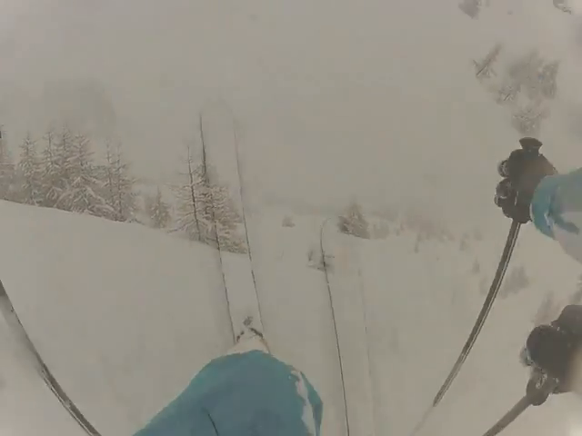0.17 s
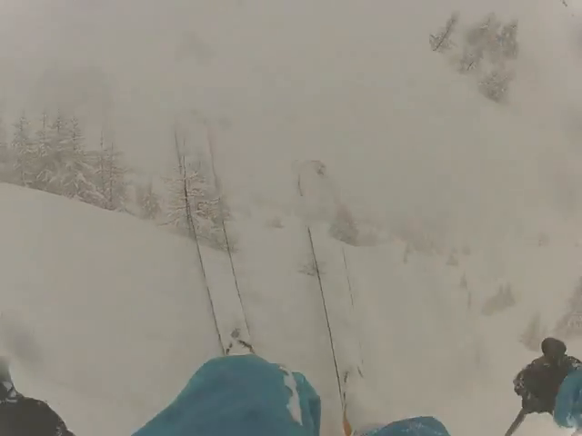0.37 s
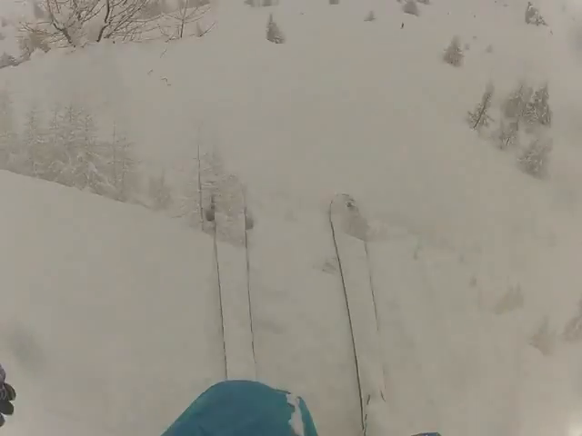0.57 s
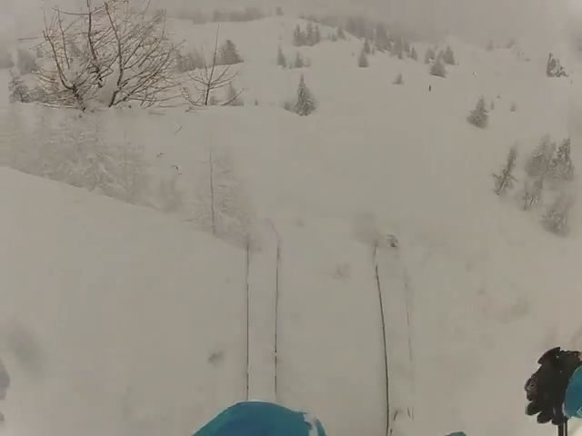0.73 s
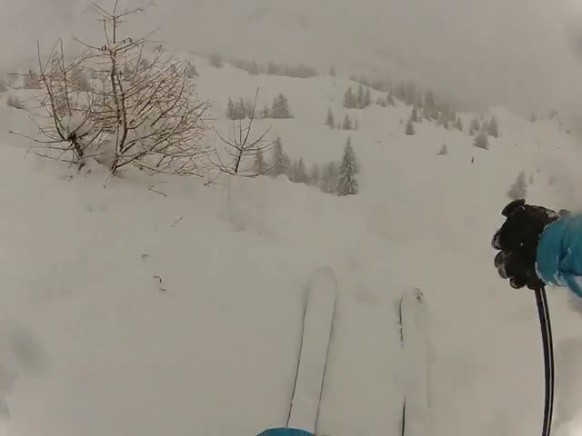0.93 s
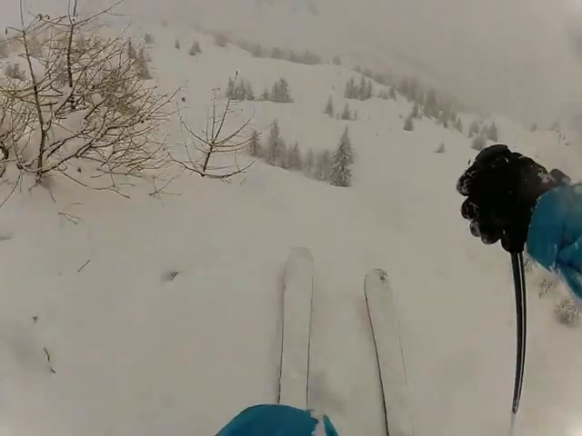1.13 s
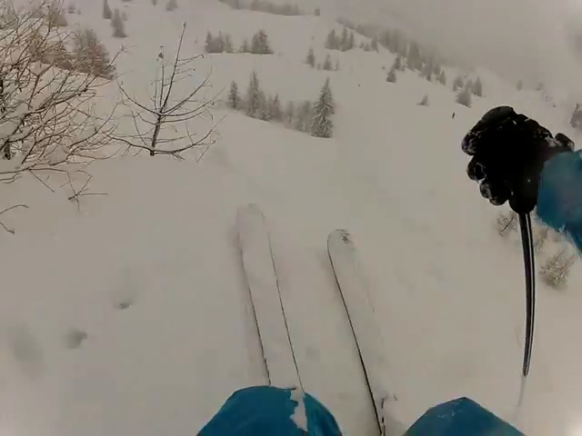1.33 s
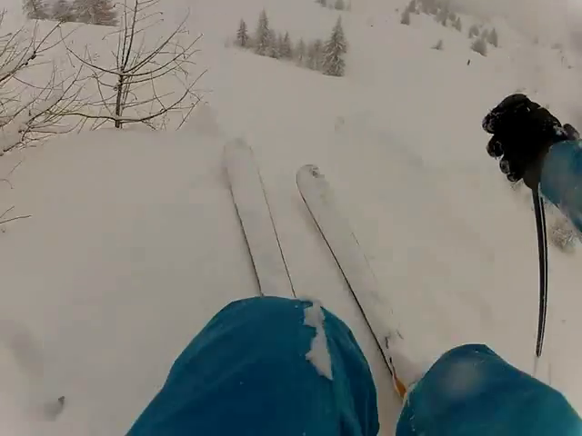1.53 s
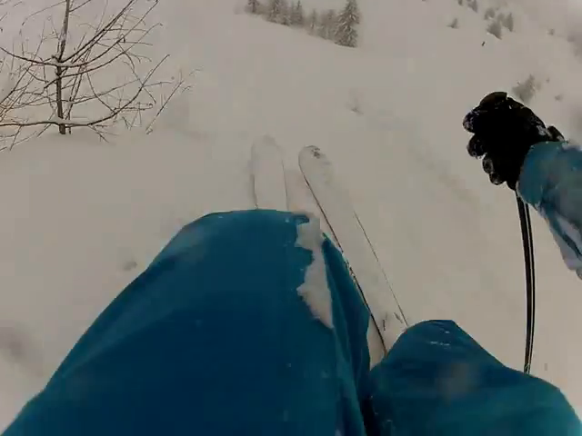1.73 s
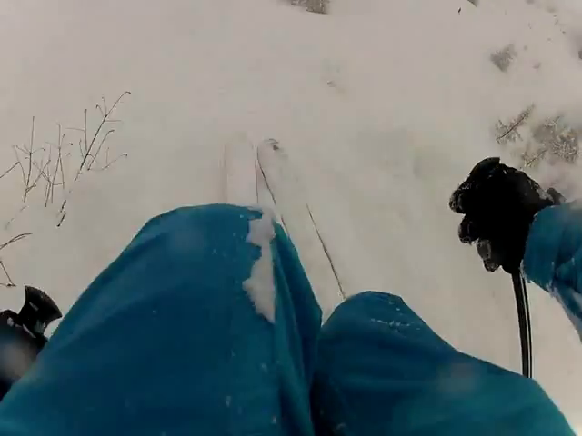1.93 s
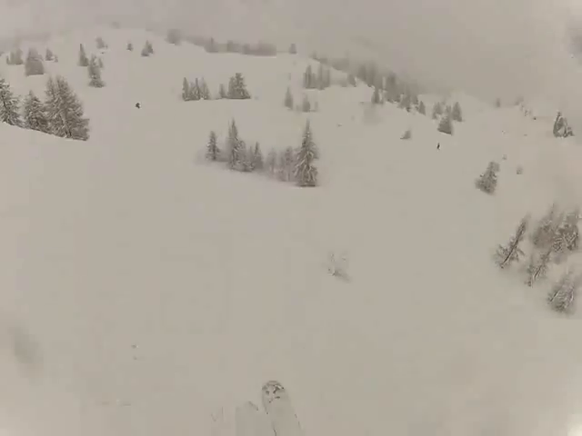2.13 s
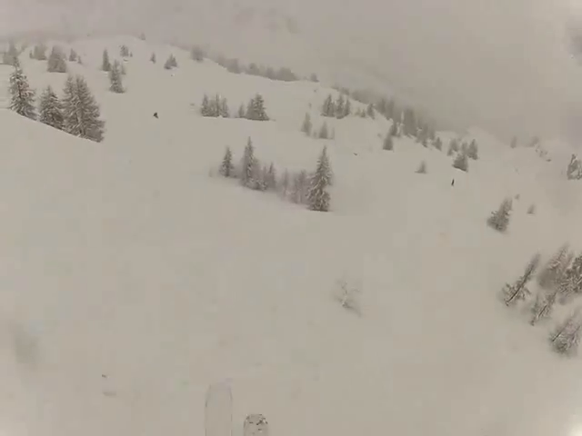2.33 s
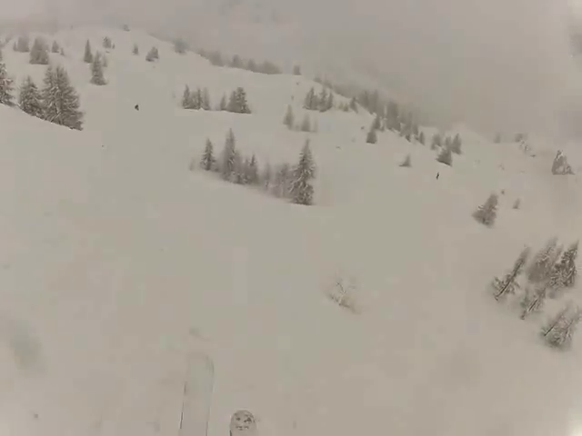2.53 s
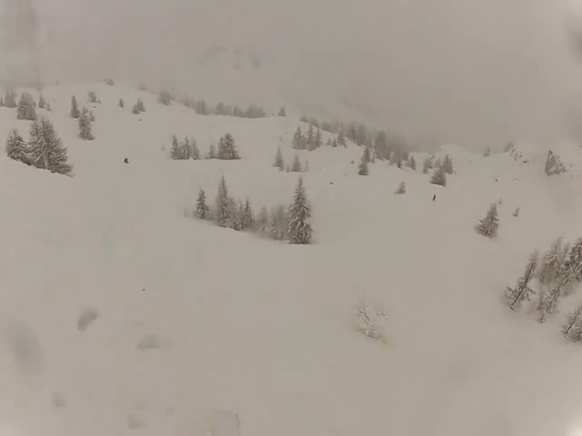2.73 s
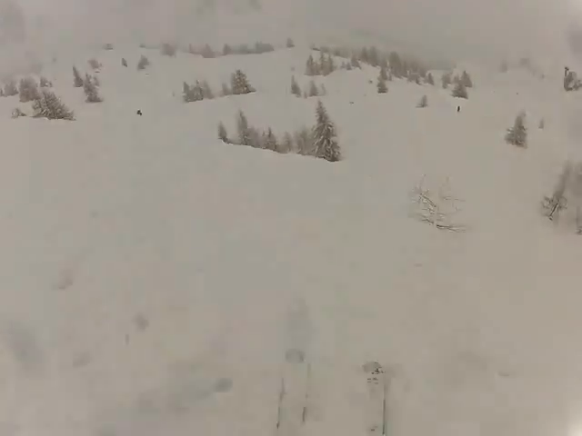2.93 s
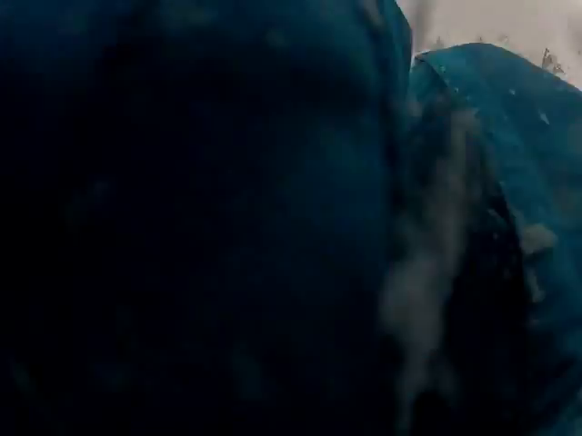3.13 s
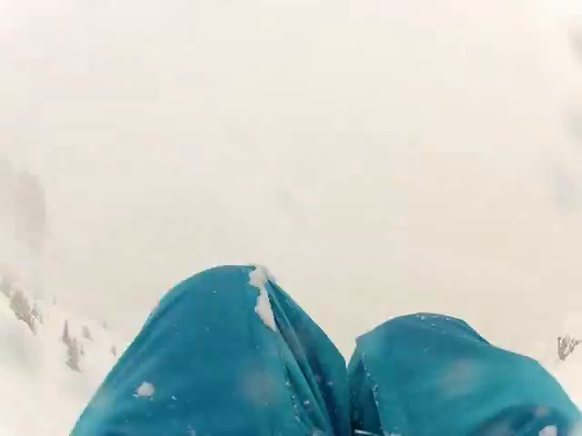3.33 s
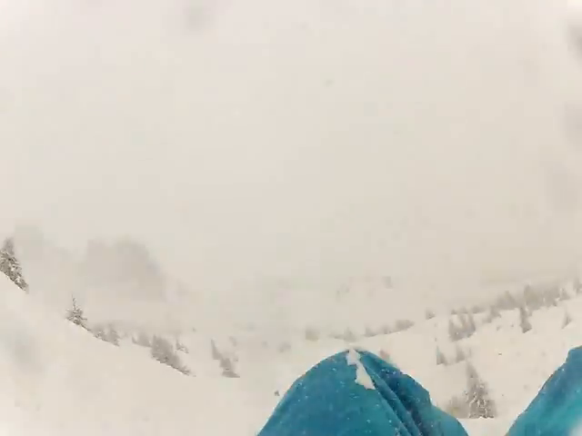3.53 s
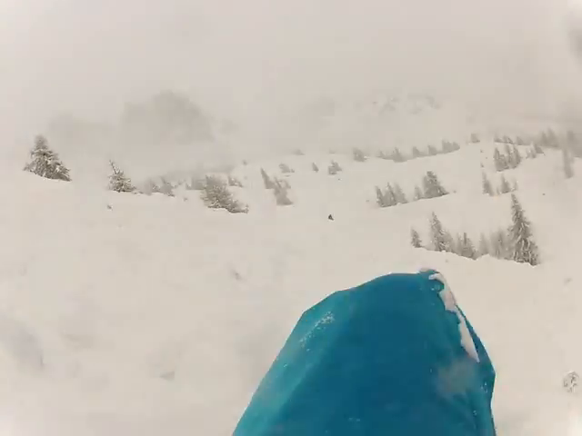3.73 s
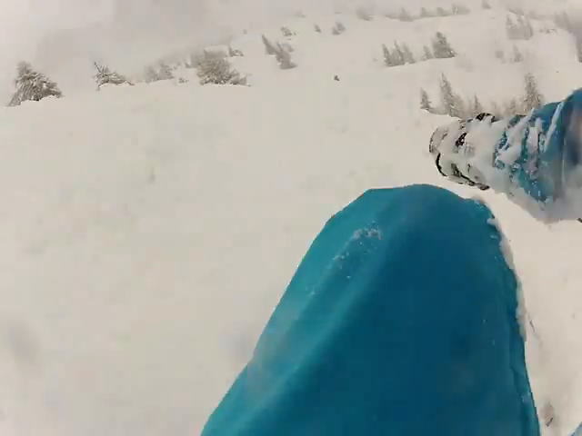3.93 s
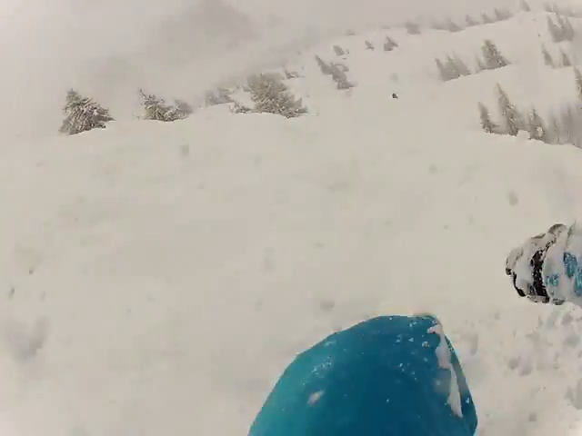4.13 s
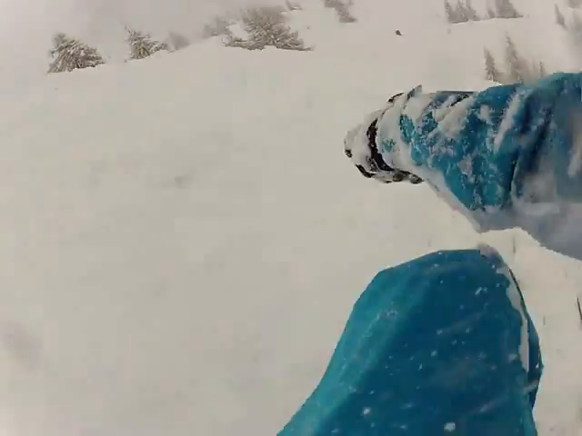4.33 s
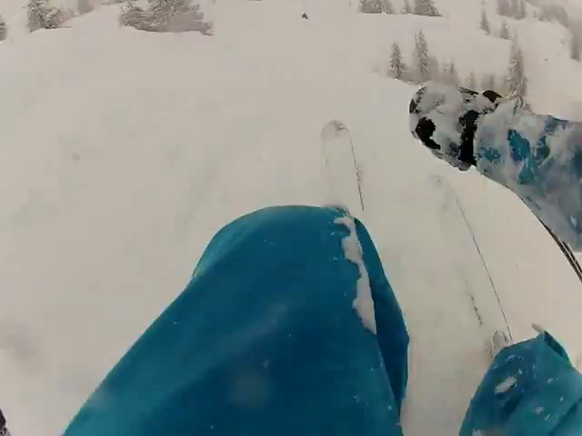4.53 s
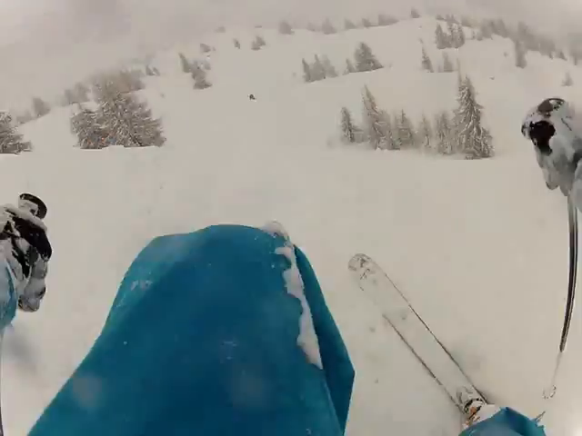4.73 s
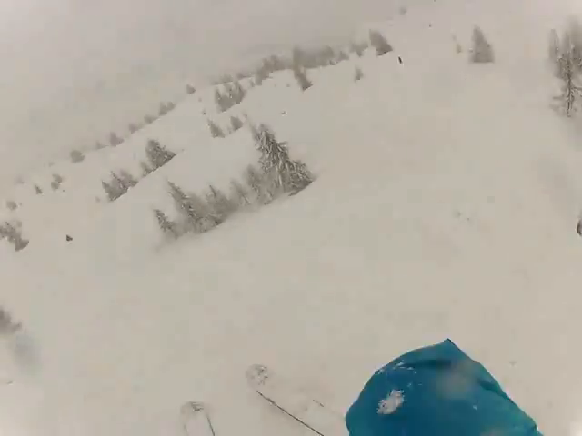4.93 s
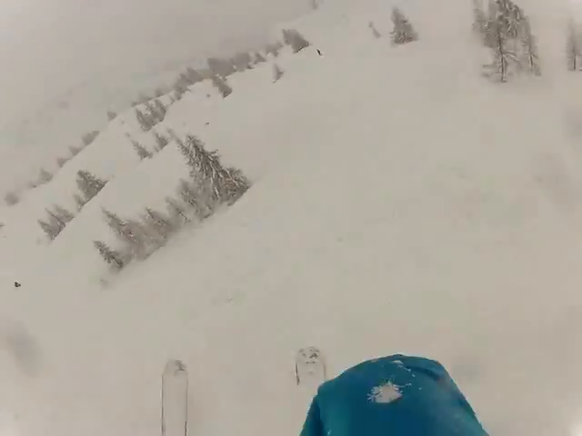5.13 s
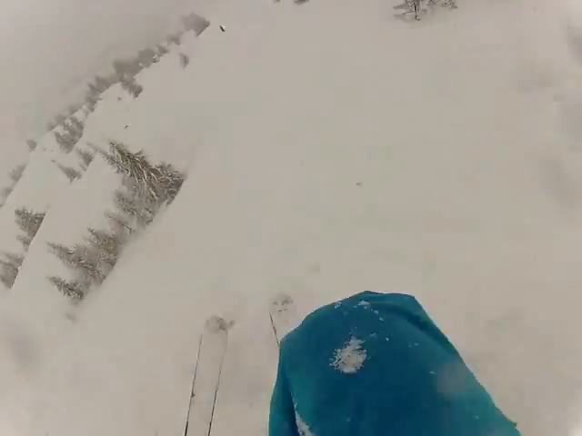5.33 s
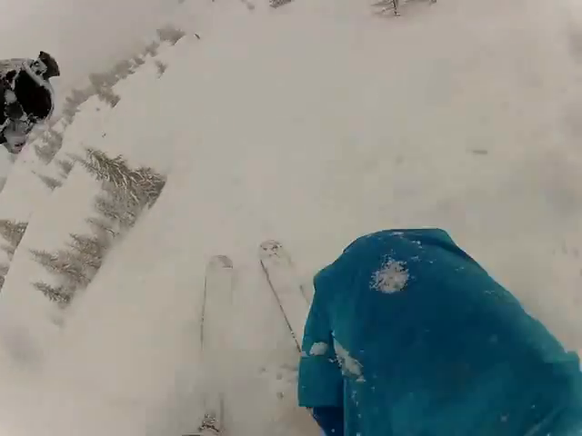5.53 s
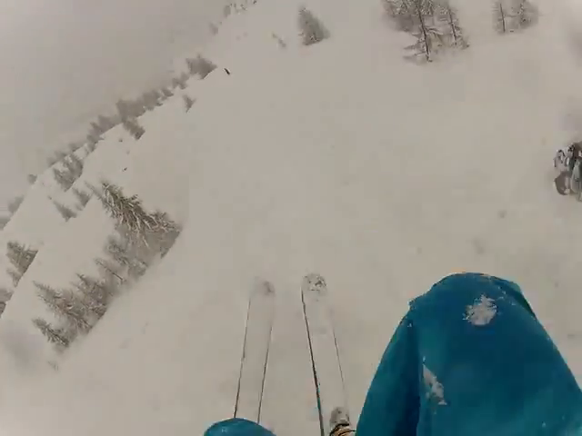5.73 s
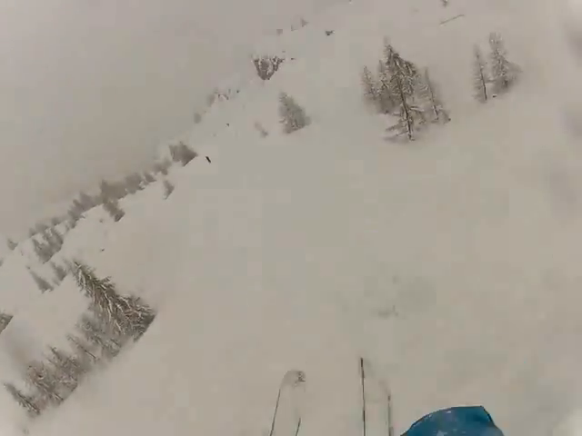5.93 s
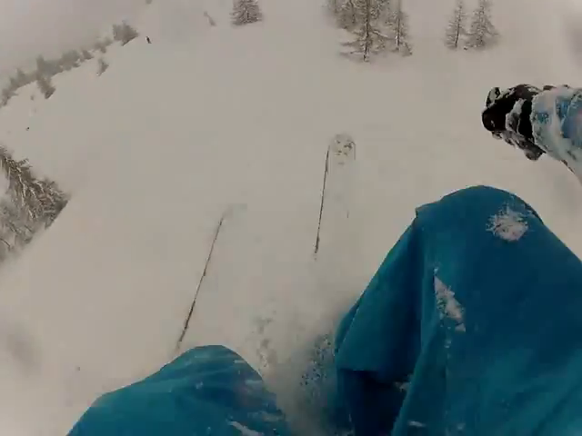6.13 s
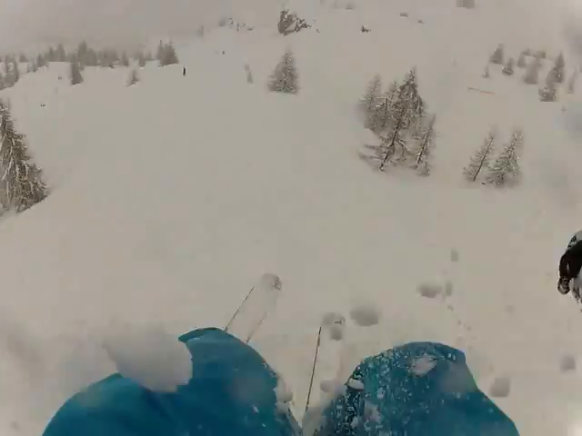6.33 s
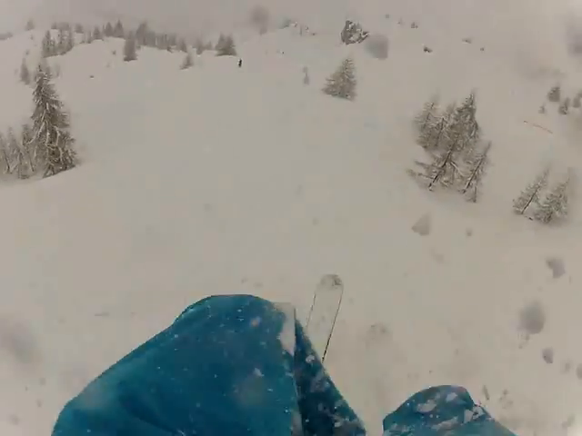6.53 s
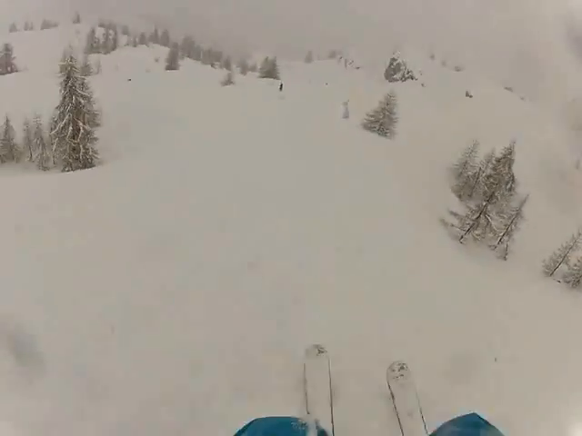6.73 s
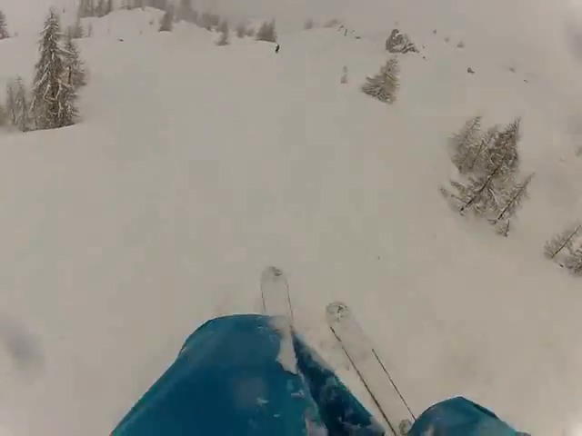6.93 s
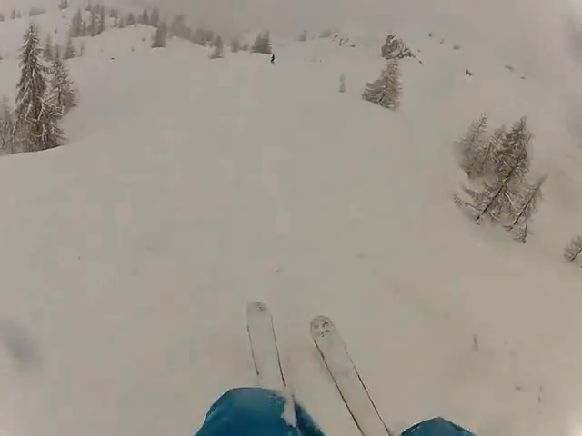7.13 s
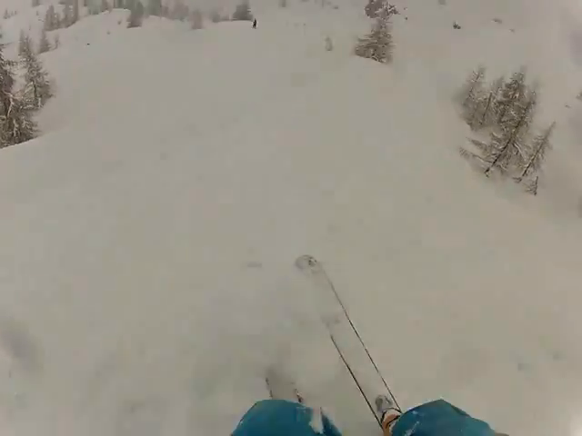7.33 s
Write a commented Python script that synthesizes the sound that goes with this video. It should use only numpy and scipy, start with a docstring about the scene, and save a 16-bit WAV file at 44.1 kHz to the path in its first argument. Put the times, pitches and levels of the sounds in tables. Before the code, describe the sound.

A skier runs through deep powder on a mountain slope, heard from a camera strapped to the body. It starts quietly, with low rumble and light scratching of snow and jacket on the plastic case. About three seconds in come very loud thumps, harsh scraping and a gust of wind. Powder then hisses and gear clacks sharply, followed by another smaller jolt and lighter knocks and ticking snow.

```python
"""A low rumble and the scratch of snow and jacket on a plastic case: a skier runs through deep powder.
The case holds a camera strapped to the body; bumps shake it, wind buffets it, and friction and knocks
excite its resonances. The skis throw up hissing powder and ticking pellets, jolts thump and gear clacks,
over a faint hiss and the camera's whine. Near 3.2 s a deep compression thumps hard enough to clip."""
import sys
import numpy as np
from scipy import signal
from scipy.fft import rfft, irfft, next_fast_len
from scipy.io import wavfile

SR = 44100
rng = np.random.default_rng(int(sys.argv[2]) if len(sys.argv) > 2 else 0)


def store_wav(level_fs):
    """Save 16-bit WAV to argv[1]."""
    pcm = np.round(np.clip(np.atleast_2d(level_fs), -1, 1) * 32767)
    wavfile.write(sys.argv[1], SR, pcm.T.astype(np.int16))


N = 325017

# the run, slow over the crest and faster below it: time_s, snow_pressure_db, wind_db
RUN = [(0.0, -56.5, -60), (1.15, -57.5, -60), (1.8, -52, -61), (2.25, -45.5, -51), (2.65, -55.5, -54),
       (2.83, -56, -47), (3.2, -31, -32), (3.38, -37, -38), (3.7, -43.5, -45), (4.07, -43.5, -42),
       (4.33, -45, -39), (4.65, -43, -43.5), (4.87, -51, -48), (5.28, -49, -48.5), (5.7, -45.5, -39),
       (6.02, -48.5, -47), (6.55, -49.5, -54), (7.37, -51, -58)]
# bumps that flex the body, rubbing the case and shaking the camera: peak_s, rise_s, fall_s, rub_db, shake_db
BUMPS = [(0.19, 0.069, 0.02, -57.5, -50), (0.55, 0.052, 0.11, -54.5, -50.5), (0.7, .06, 0.081, -57, -53.5),
         (0.86, 0.036, 0.017, -55, -60), (1.49, 0.053, 0.13, -55.5, -52), (1.97, 0.049, 0.026, -44, -42.5),
         (2.06, 0.0099, 0.074, -45.5, -48), (2.19, 0.066, 0.085, -47, -36.5),
         (2.28, 0.073, 0.062, -42, -52), (2.5, 0.072, 0.066, -54, -46.5),
         (2.965, 0.068, 0.037, -41.5, -43.5), (3.061, 0.015, 0.19, -30, -23.5),
         (3.185, 0.027, 0.047, -17.5, -17), (3.309, 0.017, 0.013, -17.5, -31),
         (3.42, 0.028, 0.12, -34.5, -27.5), (3.53, 0.034, 0.01, -24.5, -31),
         (3.589, 0.06, 0.04, -35.5, -29.5), (3.81, 0.056, 0.054, -46, -46),
         (3.98, 0.066, 0.021, -39.5, -35.5), (4.168, 0.061, 0.15, -43.5, -49),
         (4.4, 0.096, 0.061, -40.5, -41), (4.55, 0.047, 0.17, -44.5, -37.5),
         (4.73, .05, 0.073, -51.5, -39.5), (4.97, 0.067, 0.086, -46, -43.5), (5.06, 0.019, 0.046, -44, -44),
         (5.15, 0.043, 0.015, -46.5, -41), (5.41, 0.033, 0.021, -45.5, -44),
         (5.49, 0.037, 0.029, -43.5, -36.5), (5.58, 0.041, 0.024, -44, -39), (5.68, 0.023, 0.084, -32, -32),
         (5.94, 0.057, 0.036, -42, -43), (6.13, 0.044, 0.095, -42, -34.5), (6.28, 0.059, 0.18, -46, -43.5),
         (6.49, 0.046, 0.035, -41, -43.5), (6.61, 0.011, 0.064, -38, -53), (6.67, .04, 0.054, -45.5, -35.5),
         (6.82, 0.041, 0.021, -48.5, -63), (6.92, .03, 0.053, -53, -66), (7.06, 0.036, 0.019, -42.5, -36),
         (7.14, 0.041, 0.015, -46.5, -62)]
# spectrum of the dull crunch of packed snow: frequency_hz, level_db
CRUNCH_SPECTRUM = [(100, -20), (280, 6), (450, -1.5), (650, 2.5), (950, -0.5), (1300, -12.5), (3000, -62)]
FILTER_HZ = np.fft.rfftfreq(4096, 1 / SR)  # frequencies at which filter gains are given


def gain_of(db):
    """Decibels to amplitude ratio."""
    return 10 ** (np.asarray(db) / 20)


def unit_rms(x):
    """Normalisation to rms 1."""
    return x / np.sqrt(np.mean(x ** 2) + 1e-20)


def run_levels():
    """Linear interpolation of the run to every sample: snow_pressure_db, wind_db."""
    time_s, *columns = np.transpose(RUN)
    return [np.interp(np.arange(N) / SR, time_s, column) for column in columns]


def add(mix, start_s, sound):
    """Superposition of a sound on the mix."""
    part = mix[max(round(start_s * SR), 0):][:len(sound)]
    part += sound[:len(part)]


def response(spectrum):
    """Magnitude response through (frequency_hz, level_db) points, joined on a logarithmic frequency axis."""
    hz, db = np.transpose(spectrum)
    return gain_of(np.interp(np.log(FILTER_HZ + 1), np.log(hz + 1), db))


def colour(x, gain):
    """Minimum-phase filtering with the given response shape and an impulse response of energy 1."""
    log_gain = np.log(np.maximum(gain / gain.max(), 1e-5))
    log_spectrum = np.conj(signal.hilbert(np.r_[log_gain, log_gain[-2:0:-1]]))
    impulse = np.fft.ifft(np.exp(log_spectrum)).real
    return signal.oaconvolve(x, impulse / np.linalg.norm(impulse))[:len(x)]


def band(x, low_hz, high_hz):
    """Ideal band-pass filter."""
    size = next_fast_len(N)
    hz = np.fft.rfftfreq(size, 1 / SR)
    return irfft(rfft(x, size) * ((hz >= low_hz) & (hz < high_hz)), size)[:N]


def flutter(top_hz):
    """Band-limited noise for random modulation, rms 1."""
    return unit_rms(band(rng.standard_normal(N), 11, top_hz))


def grains(per_s, spread_db):
    """Shot noise: sparse impulses, mostly small and a few large, rms 1."""
    size = gain_of(spread_db * np.minimum(rng.exponential(1, N), 4.5))
    return unit_rms(size * rng.choice([-1, 1], N) * (rng.random(N) < per_s / SR))


def envelope_db(bed_db, swells, drop_db=8.5, roundness=1.44):
    """Incoherent addition: the powers of a bed and of swells that rise and fall are summed."""
    t = np.arange(0, N, 32) / SR
    power = np.zeros(len(t))
    for peak_s, rise_s, fall_s, db in swells:
        from_peak = np.maximum((peak_s - t) / rise_s, (t - peak_s) / fall_s)
        power += gain_of(db - drop_db * np.minimum(from_peak, 20) ** roundness) ** 2
    power = np.interp(np.arange(N), np.linspace(0, N, len(t)), power)
    return 10 * np.log10(gain_of(bed_db) ** 2 + power)


def impact(contact_s, rise_s, decay_s, gain):
    """Transient excitation: a noise burst grows and decays through a filter. Gives start_s, sound of peak 1."""
    t = np.arange(-SR // 50, SR // 20) / SR
    force = np.exp(-np.maximum(-t / rise_s, t / decay_s))
    sound = colour(rng.standard_normal(len(t)) * force, gain)
    return contact_s + t[0], sound / abs(sound).max()


def case_response():
    """Modal response of the plastic case: damped resonances add in power, and two notches cut the treble."""
    # resonances of the case: centre_hz, width_hz, level_db
    modes = [(622, 110, -11.5), (1203, 283, 0.5), (1475, 240, -3.5), (1823, 440, -1), (2165, 520, -1.5),
             (2580, 140, -7), (2780, 730, -9), (3577, 395, -5), (5260, 990, -20.5), (6730, 800, -23.5),
             (8440, 390, -12.5), (9850, 1450, -15), (10760, 310, -19.5), (12200, 300, -29),
             (14000, 2300, -20), (15000, 400, -29)]
    # bands the case transmits poorly: centre_hz, width_hz, depth_fraction
    notches = [(5990, 490, 0.8), (11300, 610, 0.26)]

    def lorentzian(hz, width_hz):
        return 1 / (1 + (2 * (FILTER_HZ - hz) / width_hz) ** 2)

    power = sum((gain_of(db) * lorentzian(hz, width_hz)) ** 2 for hz, width_hz, db in modes)
    passed = np.prod([1 - depth * lorentzian(hz, width_hz) for hz, width_hz, depth in notches], axis=0)
    return np.sqrt(power) * passed


def body_rumble(jerk, gain_db=0.5, jerk_db=2.5):
    """Forced vibration: snow pressure and bumps shake the camera through the skier's body."""
    # spectrum of the shaking: frequency_hz, level_db
    spectrum = [(29, -35), (50, -0.5), (140, -1), (268, -8), (323, -17), (481, -29.5), (600, -23.5),
                (641, -18.5), (700, -25), (910, -37.5), (1540, -120)]
    pressure_db, _ = run_levels()
    level_db = envelope_db(pressure_db, [(s, rise, fall, shake) for s, rise, fall, _, shake in BUMPS])
    force = rng.standard_normal(N) * gain_of(jerk_db * jerk)
    return gain_of(level_db + gain_db) * unit_rms(colour(force, response(spectrum)))


def wind_buffet():
    """Turbulence: low-frequency pressure fluctuations push on the case and swell in gusts."""
    # spectrum of the buffeting: frequency_hz, level_db
    spectrum = [(8, -16.5), (22, 11), (42, 3.5), (70, -2), (120, -1.5), (400, -53.5)]
    # gusts on the case: peak_s, rise_s, fall_s, level_db
    gusts = [(0.76, .04, 0.043, -53), (2.36, 0.057, 0.045, -36), (3.2, 0.081, 0.061, -15.5),
             (3.52, .05, 0.082, -21), (3.62, .06, .11, -26), (5.72, 0.042, 0.064, -23.5),
             (7.08, 0.047, 0.045, -39)]
    _, wind_db = run_levels()
    turbulence = unit_rms(colour(rng.standard_normal(N), response(spectrum)))
    return gain_of(envelope_db(wind_db, gusts)) * turbulence


def case_scrape(jerk, bed_db=-7, ring_db=1, treble_db=-10, crunch_db=-8, grain_share=0.61, jerk_db=1.5):
    """Stick-slip friction: snow and cloth rub the case, lightly with ski pressure, hard at each bump."""
    pressure_db, _ = run_levels()
    level_db = envelope_db(pressure_db + bed_db, [row[:4] for row in BUMPS])
    slips = np.sqrt(grain_share) * grains(per_s=1500, spread_db=4.0)
    slips += np.sqrt(1 - grain_share) * rng.standard_normal(N)
    slips *= gain_of(jerk_db * jerk)
    ringing = colour(slips, case_response())
    low, middle = band(ringing, 0, 1420), band(ringing, 1420, 6000)
    # a gentle rub favours the low resonances and the dull crunch, a hard one the higher resonances
    softness_db = -45 - level_db
    ring = gain_of(ring_db) * unit_rms(middle + low * gain_of(0.075 * softness_db))
    treble = gain_of(treble_db) * unit_rms(ringing - low - middle)
    crunch = gain_of(crunch_db + 0.16 * softness_db) * unit_rms(colour(slips, response(CRUNCH_SPECTRUM)))
    return gain_of(level_db) * (ring + treble + crunch)


def powder_spray(gain_db=4, flicker_db=2.0, hiss_bed_db=-19, pellet_bed_db=-27):
    """Granular noise: fine powder streaming off the skis merges into hiss, while pellets tick singly."""
    # plumes thrown up by the skis: peak_s, rise_s, fall_s, level_db, pellet_amplitude_ratio
    plumes = [(1.5, 0.16, 0.17, -72, .4), (1.97, .04, 0.083, -69, .3), (2.25, 0.14, 0.1, -73, .4),
              (3.2, 0.098, 0.1, -42.5, 0.82), (3.53, 0.097, 0.082, -56, .3),
              (3.78, 0.073, 0.32, -47.5, 0.5), (4.2, 0.084, 0.16, -41.5, 0.5),
              (4.38, 0.067, 0.18, -46.5, 0.4), (4.71, 0.03, 0.04, -52.5, .2),
              (5.55, 0.074, 0.091, -56, .35), (5.79, 0.05, 0.032, -55, .5), (6.15, 0.086, 0.048, -61, .5),
              (6.43, 0.07, 0.088, -51.5, 1), (6.62, 0.037, 0.16, -50.5, 0.86), (7.14, 0.073, .06, -62, .7)]
    # spectrum of the spray: frequency_hz, level_db
    spectrum = [(290, -31), (500, -11), (815, 0), (1120, -6), (1600, -21), (2200, 4.5), (2460, 0.5),
                (3480, 5.5), (4070, -2.5), (4840, 1.5), (5500, -4.5), (6000, -15), (6500, -5), (7130, -4),
                (8720, -4.5), (11600, -24), (15500, -11.5)]
    pressure_db, _ = run_levels()
    showers = [(s, rise, fall, db + 20 * np.log10(ratio)) for s, rise, fall, db, ratio in plumes]
    hiss_db = envelope_db(pressure_db + hiss_bed_db, [row[:4] for row in plumes])
    pellet_db = envelope_db(pressure_db + pellet_bed_db, showers)
    hiss = gain_of(hiss_db) * rng.standard_normal(N)
    pellets = gain_of(pellet_db) * grains(per_s=700, spread_db=6.0)
    return gain_of(gain_db + flicker_db * flutter(top_hz=27)) * colour(hiss + pellets, response(spectrum))


def hiss_and_whine(hiss_db=-66.5, whine_gain_db=-1, jitter_rad=0.1):
    """Noise floor: a faint steady hiss, and the camera's whine as two tones with random phase modulation."""
    # tones of the whine: pitch_hz, level_db
    tones = [(5039, -83), (6961, -84.5)]
    # spectrum of the hiss: frequency_hz, level_db
    spectrum = [(59, -51), (100, -2), (181, -9), (293, 4), (998, -12.5), (1800, -52), (5070, -43),
                (6000, -86), (8230, -29), (15500, -18)]
    whine, t = np.zeros(N), np.arange(N) / SR
    for hz, db in tones:
        phase = 2 * np.pi * hz * t + jitter_rad * flutter(top_hz=54)
        whine += gain_of(db + whine_gain_db) * np.sqrt(2) * np.sin(phase)
    return whine + gain_of(hiss_db) * unit_rms(colour(rng.standard_normal(N), response(spectrum)))


def case_knocks(ring_gain_db=-2, thud_gain_db=1, delay_s=0.001228):
    """Impact excitation: a blow rings the modes of the case, and its weight adds a dull thud."""
    # lumps of snow and straps striking the case: start_s, level_db, decay_s, relative_thud_db
    blows = [(0.0793, -35.5, 0.0033, -18), (0.55, -29.5, 0.0011, -15), (0.6944, -27, 0.0016, -15.5),
             (0.814, -40, 0.0018, -8), (0.864, -28.5, 0.00062, -19), (0.9773, -37.5, 0.0017, -6),
             (1.382, -43, 0.0018, 1), (1.418, -49, .002, 3), (1.865, -35.5, 0.0023, -5.5),
             (1.9718, -25.5, .0008, -24), (2.0576, -26, 0.001, -16), (2.275, -12.5, 0.00034, -34),
             (2.288, -21, .001, -29), (2.7721, -28.5, 0.00086, -9.5), (2.8505, -27, 0.00048, -13),
             (2.969, -22.5, 0.00075, -14), (3.053, -24, .0035, -6), (3.115, -11, 0.0022, -7.5),
             (3.1632, -5, 0.0046, -27), (3.192, -11, 0.0019, -3.5), (3.2135, -3.5, .0007, -26),
             (3.262, -5.5, .0016, -39), (3.295, -12, 0.0038, -32), (3.302, -15, 0.0045, -37),
             (3.3077, -1.5, 0.0026, -41), (3.402, -23, .0015, -15), (3.413, -25, 0.0018, -4),
             (3.498, -21, .0035, -10), (3.5245, -9, 0.0068, -20), (3.5322, -9, 0.0018, -35),
             (3.611, -20.5, .002, -5.5), (3.639, -24.5, 0.0022, -2.5), (3.7953, -25.5, .0024, -3.5),
             (3.8205, -15.5, 0.0015, -13.5), (3.9126, -26, 0.0022, -27), (3.942, -26, 0.0019, -16.5),
             (3.995, -17, 0.002, -16), (4.131, -21.5, 0.0018, -7), (4.4074, -20, 0.0012, -15),
             (4.4958, -17, 0.0016, -15), (4.978, -29.5, 0.0026, -5.5), (5.061, -12, 0.00093, -19),
             (5.459, -30, 0.0032, -2.5), (5.613, -27.5, .0015, -6), (5.657, -28, 0.0011, -13),
             (5.683, -13.5, 0.0031, -15), (5.7155, -5.5, 0.00056, -10), (5.739, -16.5, 0.0013, -2),
             (5.7516, -21.5, 0.0077, -7), (6.052, -22.5, 0.0013, -36), (6.118, -23, 0.0017, -16),
             (6.54, -21.5, 0.0012, -24), (6.6027, -26, 0.0021, -32), (6.6539, -25, .0035, -8),
             (6.7831, -26.5, 0.0015, -38), (6.9204, -26, 0.0012, -26), (6.998, -27.5, 0.00092, -30),
             (7.0447, -20.5, .0016, -12.5), (7.0621, -20, 0.0028, -28)]
    out, resonant, dull = np.zeros(N), case_response(), response(CRUNCH_SPECTRUM)
    for s, db, decay_s, thud_db in blows:
        start_s, ring = impact(s + delay_s, rise_s=0.00083, decay_s=decay_s, gain=resonant)
        _, thud = impact(s + delay_s, rise_s=0.00039, decay_s=1.06 * decay_s, gain=dull)
        knock = gain_of(ring_gain_db) * ring + gain_of(thud_db + thud_gain_db) * thud
        add(out, start_s, gain_of(db) * knock)
    return out


def harness_thumps(gain_db=-3.5, pitch_sag=0.26):
    """Damped oscillation: each jolt briefly swings the camera on its harness, slowing as it dies."""
    # jolts of the body: start_s, level_db, pitch_hz, length_cycles
    jolts = [(0.528, -31, 60, 0.46), (1.225, -38.5, 140, 2.5), (1.408, -39, 173, 1.9),
             (1.491, -30, 92, 0.9), (1.583, -32.5, 141, 1), (2.343, -25, 97, 0.96),
             (2.489, -25.5, 138, 0.94), (2.548, -27.5, 110, 1.15), (3.052, -3.5, 156, 1.4),
             (3.111, -0.5, 121, 1.43), (3.153, 3.5, 138.5, 1.32), (3.185, -2.5, 149, 2.1),
             (3.2, 1, 52.3, 1.06), (3.411, -13.5, 111, 1.4), (3.435, -16, 132, 3.9), (3.499, -9.5, 51, 1),
             (3.607, -17.5, 48.7, 1.8), (4.144, -18.5, 102, 1.05), (4.234, -16.5, 175, 1.3),
             (4.4, -20, 95, 0.65), (5.45, -19, 160, 1.45), (5.689, -11, 119, 1.34),
             (5.741, -14.5, 122, 2.7), (6.688, -20.5, 167, 1.3), (7.044, -21.5, 256, 3.7)]
    out, t = np.zeros(N), np.arange(SR // 6) / SR
    for start_s, db, hz, cycles in jolts:
        age = t * hz / max(cycles, .5)
        phase = 2 * np.pi * hz * t * (1 + pitch_sag * np.exp(-age))
        swing = age ** 2 * np.exp(-4 * age) * np.sin(phase)
        add(out, start_s - .001, gain_of(db + gain_db) * swing / abs(swing).max())
    return out


def gear_clacks(gain_db=-1, delay_s=0.0013):
    """Hard collisions: a short contact time makes a bright, dry click."""
    # skis, poles and buckles striking together: start_s, level_db, decay_s
    collisions = [(0.7497, -40, 0.0012), (2.54, -37.5, 0.0018), (2.7198, -33, 0.0011),
                  (2.767, -34, 0.00073), (2.7723, -36, 0.0013), (4.0622, 0.5, 0.0019),
                  (4.0669, -10.5, 0.0007), (4.0794, -20, 0.0011), (4.1056, -34, 0.0011),
                  (4.3703, -20.5, 0.0006), (4.6242, -27, 0.0011), (5.785, -29.5, 0.0016),
                  (6.4234, -24, 0.00096), (6.531, -29, 0.0016), (6.817, -24, 0.00067),
                  (6.8628, -19, 0.0013), (7.0254, -36, 0.001), (7.1242, -27, 0.0014),
                  (7.1551, -28.5, 0.0046), (7.2272, -31, 0.0034)]
    # spectrum of a clack: frequency_hz, level_db
    spectrum = [(590, -24.5), (1000, -12), (1360, -26), (1700, -12), (1970, -3), (2250, -6.5), (2600, -3),
                (3040, -10), (3490, -1.5), (4100, -8.5), (5920, -15), (8640, -10), (11800, -41),
                (14100, -19), (15500, -17.5)]
    out = np.zeros(N)
    for s, db, decay_s in collisions:
        start_s, click = impact(s + delay_s, rise_s=0.00045, decay_s=decay_s, gain=response(spectrum))
        add(out, start_s, gain_of(db + gain_db) * click)
    return out


def scene():
    """Superposition of all sources in mono; the same small jerks modulate both rumble and scraping."""
    jerk = unit_rms(flutter(top_hz=35) + 0.5 * flutter(top_hz=140))
    skiing = body_rumble(jerk) + wind_buffet() + case_scrape(jerk) + powder_spray()
    impacts = case_knocks() + harness_thumps() + gear_clacks()
    return (skiing + impacts + hiss_and_whine())[None]


def record(dry, cutoff_hz=15400):
    """Hard clipping flattens the loudest blows; a low-pass filter then limits the bandwidth."""
    clipped = np.clip(dry[0], -1, 1)
    low_pass = signal.firwin(255, cutoff_hz, window=("kaiser", 8), fs=SR)
    return signal.oaconvolve(clipped, low_pass, "same")[None]


dry = scene()
out = record(dry)
store_wav(out)
```